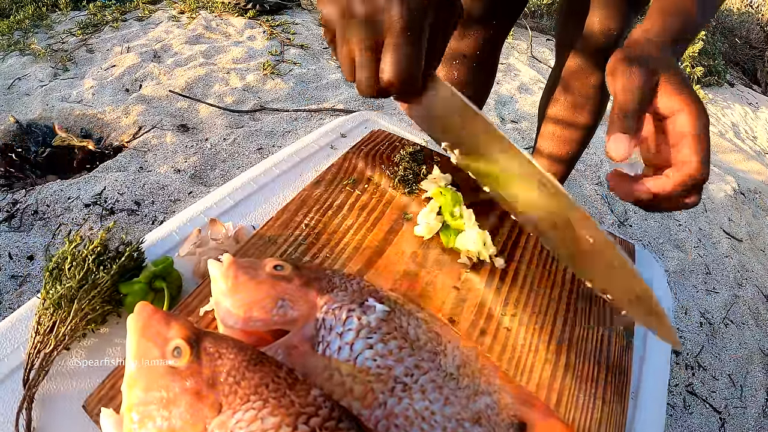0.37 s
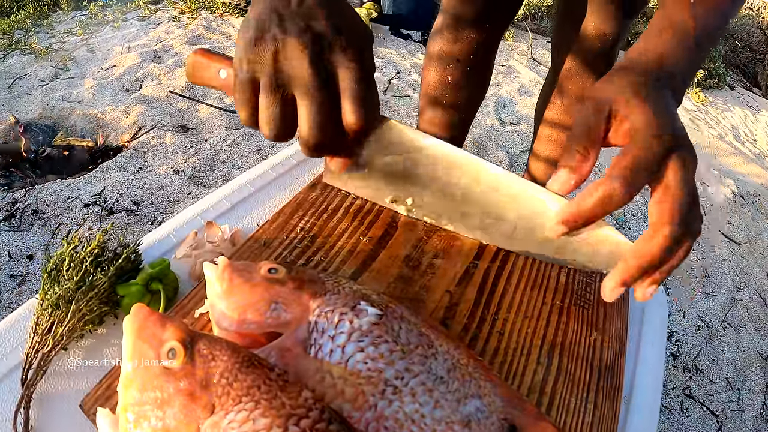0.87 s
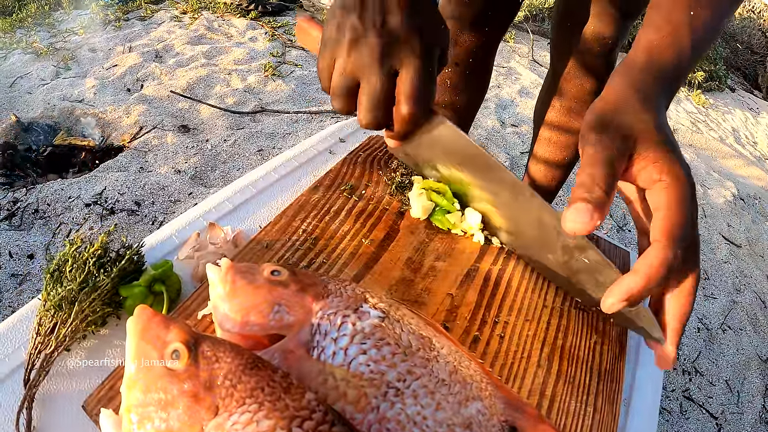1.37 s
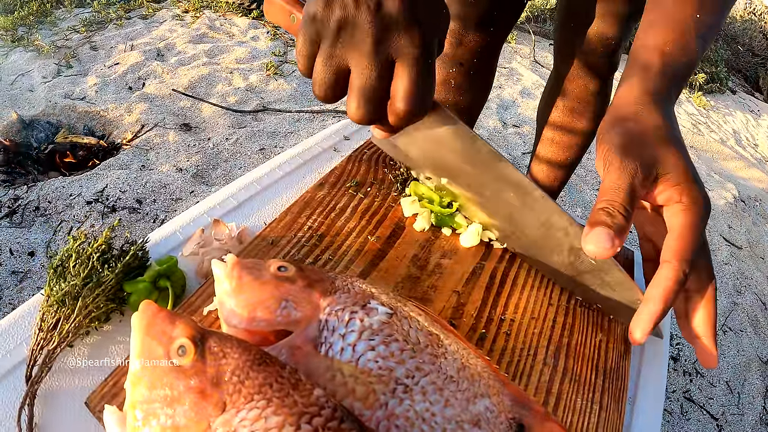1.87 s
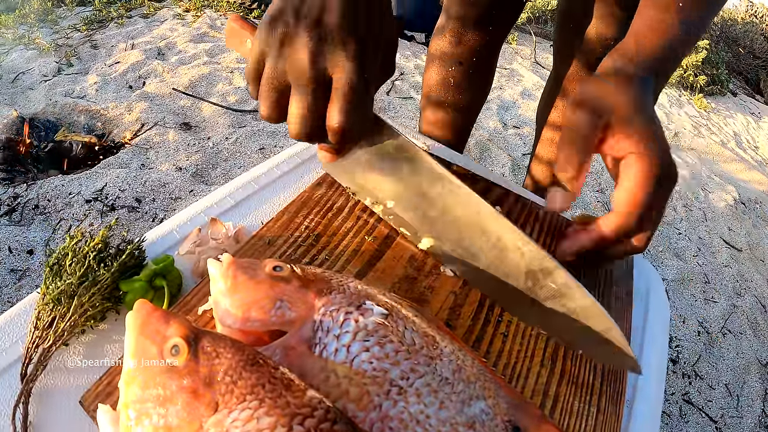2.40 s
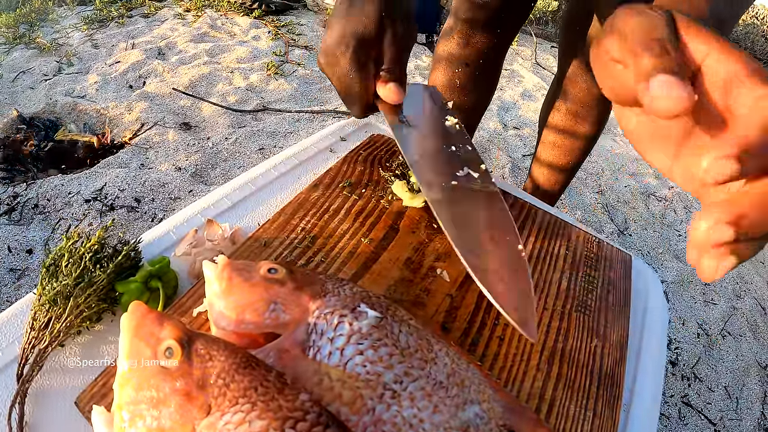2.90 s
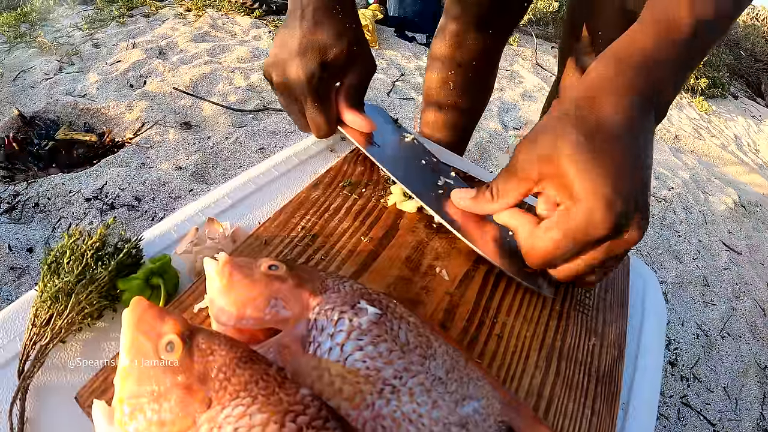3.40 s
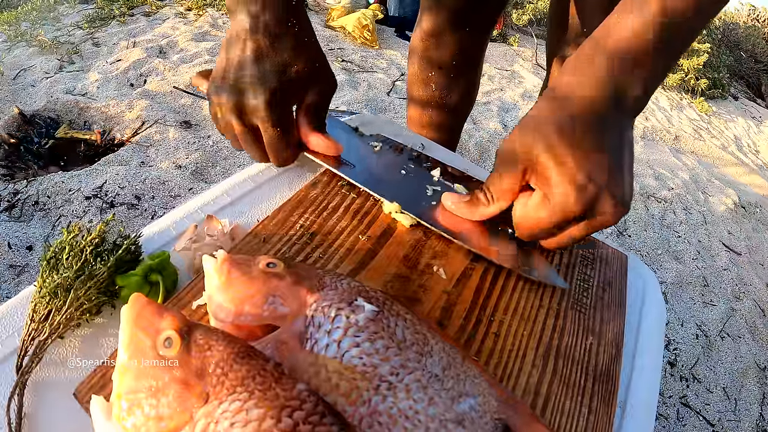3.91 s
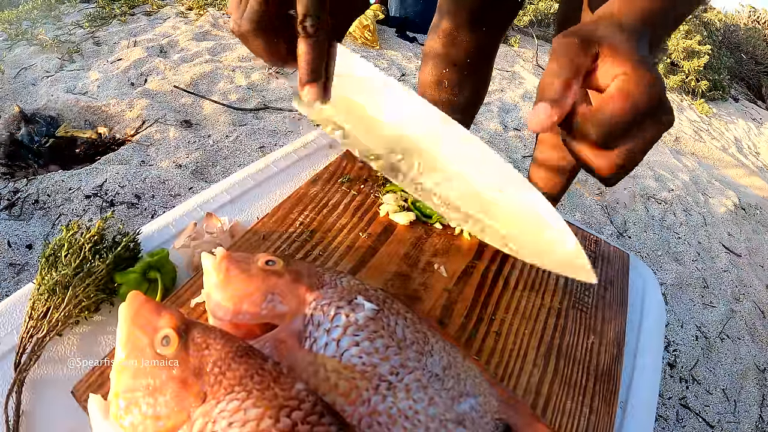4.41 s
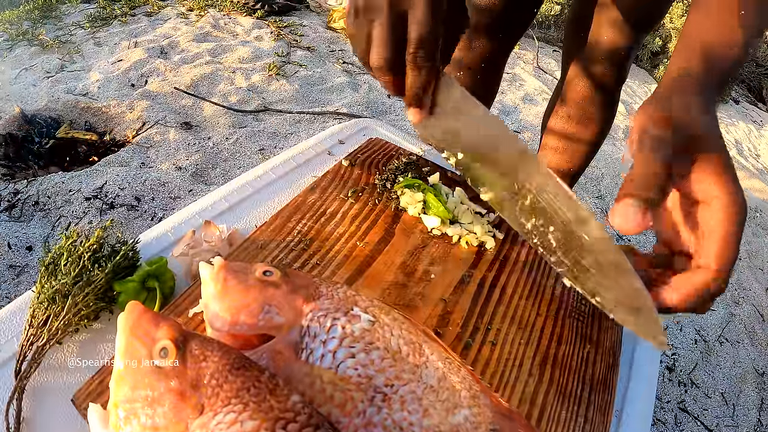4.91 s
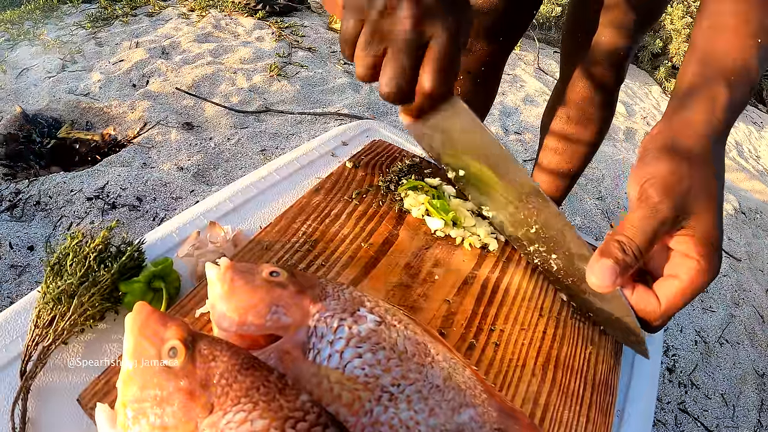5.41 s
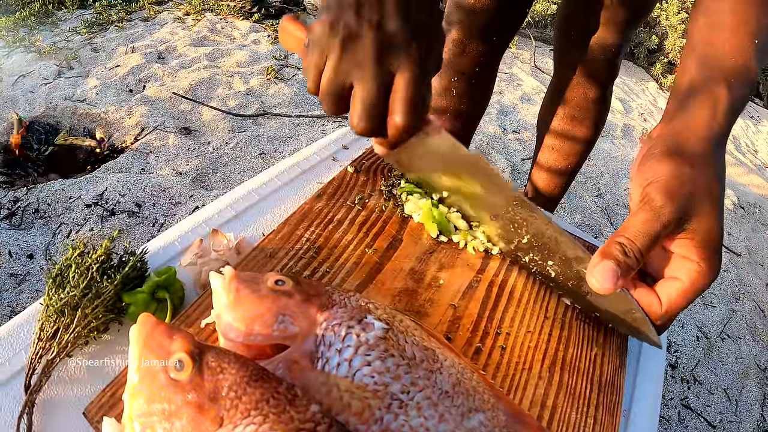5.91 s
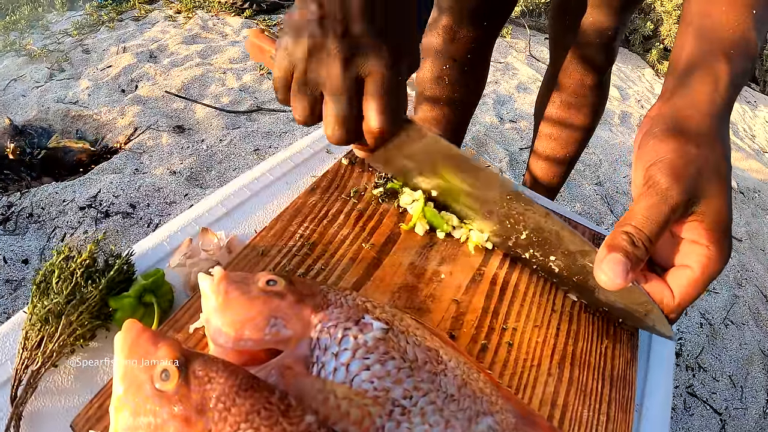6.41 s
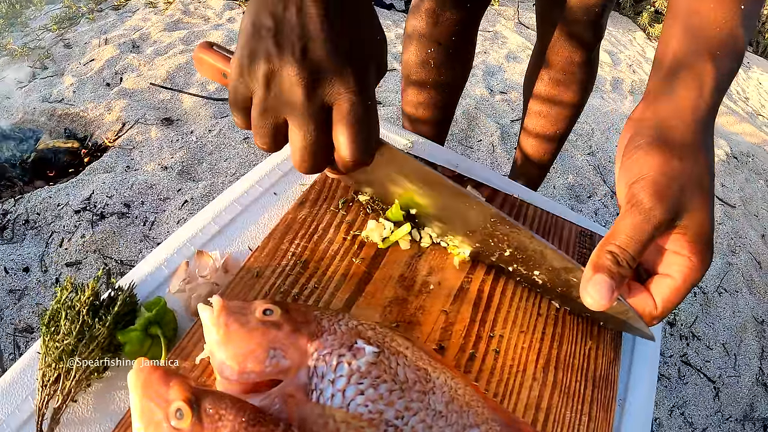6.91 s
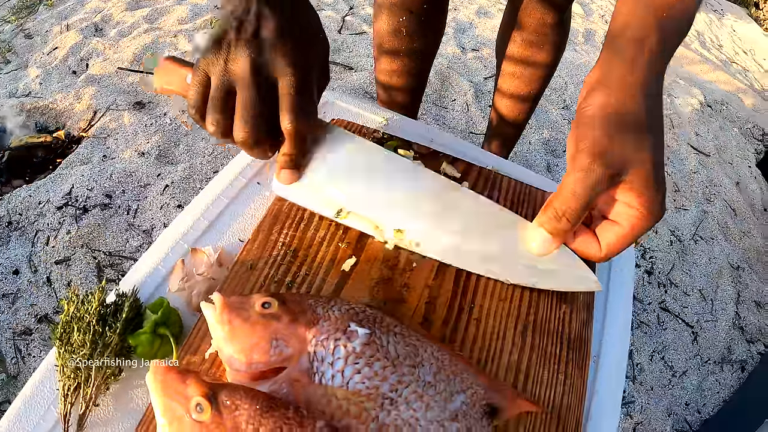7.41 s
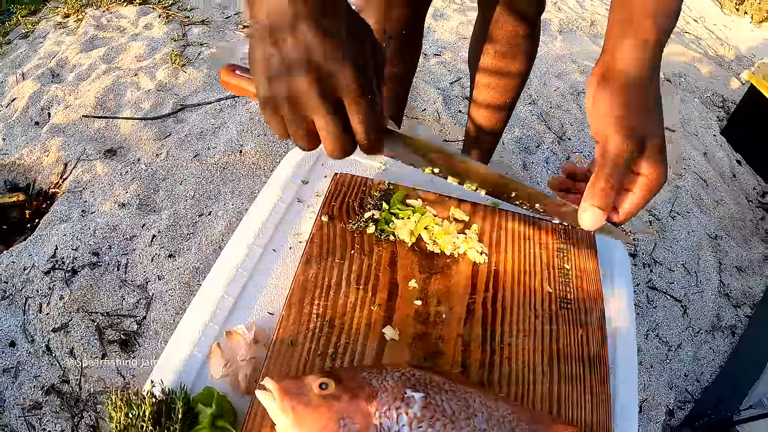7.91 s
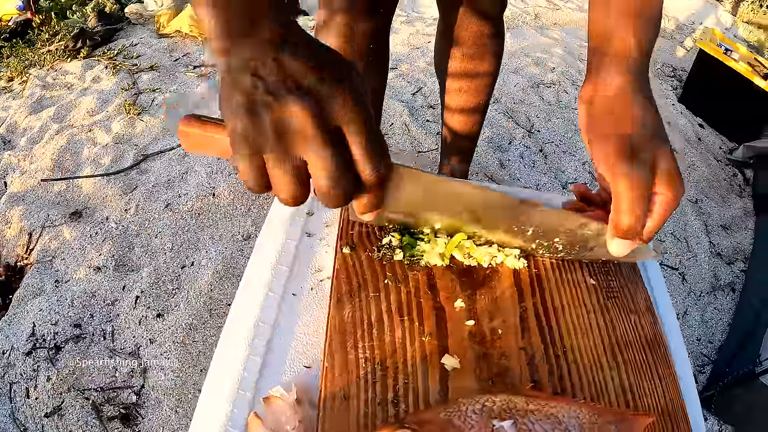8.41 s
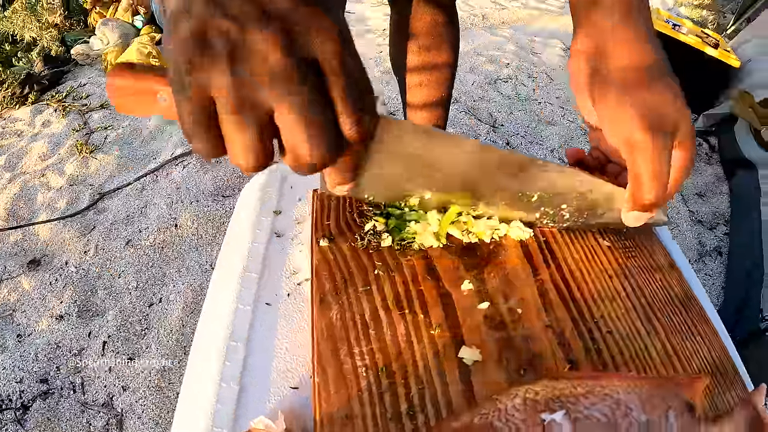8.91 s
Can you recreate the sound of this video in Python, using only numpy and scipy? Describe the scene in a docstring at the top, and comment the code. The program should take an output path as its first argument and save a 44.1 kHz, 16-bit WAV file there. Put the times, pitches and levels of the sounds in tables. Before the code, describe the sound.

On an open beach, a blade minces moist vegetables very near the microphone, slightly left. Dry woody knocks carry low boxy thumps and short crunches. A brief chopping burst gives way to quiet wiping and sticky clicks, then a faster, longer run at about six chops a second. Metallic, gritty scrapes gather the pieces between bursts. Distant surf hiss, faint insect whirr and low wind rumble continue underneath.

```python
"""A large knife minces garlic and pepper on a wooden board that lies on a hollow plastic box on a beach.
The edge crunches through the pile, knocks the board, makes the box thump and scrapes the pieces together;
surf hisses far off, insects whirr and wind buffets the microphone.
Blows ring decaying sine modes; crunch and friction are enveloped noise grains; the beach is shaped noise."""
import sys
import numpy as np
from scipy import signal
from scipy.fft import rfft, irfft, next_fast_len
from scipy.io import wavfile
from scipy.ndimage import uniform_filter1d, map_coordinates

SR = 44100
rng = np.random.default_rng(int(sys.argv[2]) if len(sys.argv) > 2 else 0)


def elevation(decibels):
    """Turn decibel levels (scalar or array-like) into linear amplitude ratios."""
    levels = np.asarray(decibels, float)
    return 10 ** (levels / 20)


def to_wav(s):
    """Save 16-bit WAV."""
    ch = np.atleast_2d(s).T  # columns
    pcm = np.round(np.clip(ch, -1, 1) * 32767)  # PCM
    wavfile.write(sys.argv[1], SR, pcm.astype(np.int16))


N = 399105

# rocking chops through the pile: (landing [s], sinking [s], knock [dB], crunch [dB],
# grind on the board [dB], box thump [dB])
CHOP_ROWS = [(1.499, 0.024, -46, -39.5, -35, -16.5), (1.689, 0.018, -19.5, -40, -26, -11),
             (1.8683, 0.022, -9, -35, -26, -5.5), (2.0322, .024, -8.5, -38, -24.5, -6),
             (2.1781, 0.018, -12.5, -28, -22, -7.5), (5.1444, 0.019, -12.5, -65, -53.5, -20),
             (5.412, 0.032, -16, -45, -33.5, -10), (5.571, 0.021, -20, -31, -27.5, -13.5),
             (5.7269, 0.016, -13, -33.5, -22.5, -10.5), (5.8847, .02, -16.5, -31, -25.5, -11.5),
             (6.04, 0.018, -11.5, -32.5, -24.5, -6.5), (6.1909, 0.014, -20.5, -28, -24, -9.5),
             (6.3478, 0.017, -16, -28, -23, -9), (6.5069, 0.019, -14.5, -27, -24.5, -5.5),
             (6.6679, 0.022, -9.5, -31, -23.5, -4.5), (6.8353, 0.027, -29, -33, -26, -12),
             (6.994, 0.021, -30, -37, -23.5, -19.5), (7.1499, 0.015, -12, -34.5, -21, -10.5),
             (8.735, 0.026, -31, -40, -35, -27), (8.889, 0.0098, -17.5, -34.5, -22.5, -12),
             (9.048, 0.015, -21, -44, -28, -26)]
# blade set down or knocked on the bare board: (time [s], level [dB], lift of the high modes [dB],
# lift of the low modes [dB], board pitch [ratio])
KNOCK_ROWS = [(0.171, -13, -11.5, -3, 0.925), (0.2098, -16, 3, 0, .97), (0.752, -3, -6, -4.5, 1.14),
              (1.4495, -5, -5, -1.5, 1.06), (2.1665, -24.5, 25, 3.5, .98), (2.5001, -4, -4, -4.5, 1.03),
              (3.5639, -22.5, -3, -6, .97), (3.626, -26, 8, -30, 1.09), (3.745, -19, 13.5, -32, .97),
              (4.601, -7.5, 6, 0, 1.03), (5.1256, -18, -8, 4, .9), (5.4273, -15, -23, -9, .99),
              (5.4627, -10.5, -4, -5, .99), (5.6234, -21, -21, 1.5, .99), (5.7441, -11.5, -15, -5.5, 0.964),
              (6.2247, -22.5, -7, -5, 0.91), (7.5021, -11, 12.5, -1, 1.014), (8.06, -3, 5, -2.5, 0.983),
              (8.4717, -2.5, 2.5, -4.5, .95), (8.784, -24, 1, 0.5, .99), (8.9262, -13.5, 1, 1, 0.903)]
# resonances of the pressed blade: (frequency [Hz], width [Hz], level [dB])
BLADE_MODES = [(1096, 34, 3), (1970, 60, -0.5), (2256, 35, -3), (2510, 150, -3), (2820, 110, -3),
               (3590, 330, -12.5), (4250, 50, -6), (4700, 110, -6.5), (5360, 79, -12.5), (5920, 80, -10),
               (7130, 90, -9.5), (8130, 240, -24.5), (9950, 110, -19.5)]


def unit(x):
    """Scaled to rms 1."""
    return x / np.sqrt(np.mean(x ** 2) + 1e-20)


def along(points, hz):
    """Interpolates (frequency [Hz], value) points on a log frequency axis."""
    point_hz, value = np.transpose(points)
    return np.interp(np.log(hz + 1), np.log(point_hz + 1), value)


def curves(rows):
    """One value per sample for each column after the time."""
    time_s, *columns = np.transpose(rows)
    return [np.interp(np.arange(N) / SR, time_s, column) for column in columns]


def wobble(rate_hz, size=N):
    """A smooth random curve with rate_hz knots a second."""
    knots = rng.standard_normal(size // 32 + 4)
    return map_coordinates(knots, [np.arange(size) * rate_hz / SR])


def filtered(x, response):
    """x through a complex response of frequency."""
    size = next_fast_len(x.shape[-1] + 8192)
    spectrum = rfft(x, size) * response(np.fft.rfftfreq(size, 1 / SR))
    return irfft(spectrum, size)[..., :x.shape[-1]]


def grit(spike_db, rate_hz, size=N):
    """Noise whose random gain makes short grains of unequal size; rms 1."""
    return unit(rng.standard_normal(size) * elevation(spike_db * wobble(rate_hz, size)))


def add(track, time_s, sound):
    """Mixes a sound into a track at a time."""
    room = track[round(time_s * SR):][:len(sound)]
    room += sound[:len(room)]


def crackle(envelope, spike_db, rate_hz):
    """Grains under an envelope, coloured afterwards; rms 1 where the envelope is 1."""
    # colour of the crunch: (frequency [Hz], level [dB])
    colour = [(760, -36.5), (1300, -3), (2470, -7), (3110, -14), (4750, -7), (7660, -18.5), (11700, -33),
              (15500, -48)]
    grains = grit(spike_db, rate_hz)
    pair = np.array([grains, grains * envelope])
    plain, shaped = filtered(pair, lambda hz: elevation(along(colour, hz)))
    return shaped / np.std(plain)


def board_ring(edge_db, body_db, scatter_db, damping, pitch=1):
    """The board's modes after one blow: a sharp contact lifts the high ones, a heavy one the low."""
    # board modes at pitch 1 and damping 1: (frequency [Hz], level [dB], t60 [s])
    board_modes = [(206.6, -10.5, 0.053), (319, -8.5, 0.041), (405, -10, 0.032), (515.5, -6, 0.032),
                   (587.4, -8, 0.034), (857, -7, 0.031), (994, 3.5, 0.027), (1109.5, -9.5, 0.048),
                   (1266, -1, 0.018), (1420, -3.5, 0.014), (1675, -22, 0.041), (1990, -21.5, 0.027),
                   (2250, -22.5, 0.019), (2423, -11, 0.017), (3230, -19, 0.011), (4050, -29, 0.027),
                   (4820, -21.5, 0.0097), (5700, -41, .013)]
    t = np.arange(SR // 10) / SR
    hz, db, t60_s = np.transpose(board_modes)[:, :, None]
    db = db + np.where(hz > 1800, edge_db, np.where(hz < 700, body_db, 0))
    chance = rng.standard_normal((2, *hz.shape))  # each spot rings a little differently
    turns = pitch * hz * (1 + 0.027 * chance[0]) * t
    decay = elevation(db + scatter_db * chance[1] - 60 * damping * t / t60_s)
    ring = decay * np.sin(2 * np.pi * turns)
    return ring.sum(axis=0) * (1 - np.exp(-t / 0.00058))


def board_rub(envelope, edge_db, body_db, damping):
    """The pressed board driven by dense friction grains; rms 1 where the envelope is 1."""
    ring = board_ring(edge_db, body_db, scatter_db=1.0, damping=damping)
    grains = grit(spike_db=4.5, rate_hz=400, size=len(envelope))
    return signal.fftconvolve(grains * envelope, ring / np.linalg.norm(ring))[:len(envelope)]


def cuts():
    """The crunch swells as the edge sinks in and stops short at the wood; then the blade rocks back."""
    # pieces crushed or wiped off without a landing: (start [s], length [s], crunch [dB],
    # grind on the board [dB])
    crush_rows = [(0.165, 0.014, -57, -38.5), (1.537, 0.011, -47.5, -38.5), (3.556, 0.026, -37, -45.5),
                  (3.957, 0.018, -42, -47), (4.058, 0.036, -50, -55.5), (4.098, 0.022, -50, -62),
                  (5.276, 0.014, -50.5, -52), (7.263, 0.01, -43, -39), (7.889, 0.016, -38.5, -44)]
    full_before_s, stop_after_s = 0.005, 0.0054  # around the landing
    crush_full = 0.65  # share of the length at which a crush is loudest
    grind, crunch = np.zeros(N), np.zeros(N)
    t = np.arange(SR // 5) / SR - .02
    strokes = [(s - sink_s, sink_s - full_before_s, sink_s + stop_after_s, crunch_db, board_db)
               for s, sink_s, _, crunch_db, board_db, _ in CHOP_ROWS]
    strokes += [(s, crush_full * length_s, length_s, crunch_db, board_db)
                for s, length_s, crunch_db, board_db in crush_rows]
    for start_s, full_s, stop_s, crunch_db, board_db in strokes:
        shape_s = [-.02, 0, .004, full_s, stop_s, stop_s + 0.016]
        shape_db = np.interp(t, shape_s, [-48.5, -19, -3, 6.0, -1.0, -51.5], right=-99)
        rock_db = np.interp(t - stop_s, [0, .01, .045, .1], [-31, -12.5, -14.5, -51.5])
        rock_db = rock_db + 4 * wobble(64.6, len(t))
        add(crunch, start_s + t[0], elevation(crunch_db + shape_db))
        pressure = elevation(0.77 * shape_db) + elevation(rock_db)
        rub = board_rub(pressure, edge_db=6.5, body_db=2.0, damping=2.07)
        add(grind, start_s + t[0], elevation(board_db) * rub)
    return grind + crackle(crunch, spike_db=4, rate_hz=700)


def knocks():
    """Each blow rings the board and gives a short bright crack."""
    chop_edge_db, chop_body_db, chop_pitch = -2.5, -5, 0.92
    tap_after_s, tap_db = .04, -14  # the rocking blade taps the board again after a landing
    crack_db = -24  # against the lifted high modes
    out, cracks = np.zeros(N), np.zeros(N)
    t = np.arange(SR // 50) / SR
    landings = [(s, db, chop_edge_db, chop_body_db, chop_pitch) for s, _, db, *_ in CHOP_ROWS]
    taps = [(s + tap_after_s * (1 + 0.17 * rng.standard_normal()), db + tap_db, *rest)
            for s, db, *rest in landings[:-1]]
    for s, db, edge_db, body_db, pitch in [*KNOCK_ROWS, *landings, *taps]:
        ring = board_ring(edge_db, body_db, scatter_db=5.0, damping=1.117, pitch=pitch)
        add(out, s, elevation(db) * ring)
        add(cracks, s, elevation(db + edge_db + crack_db - 60 * t / 0.018))
    return out + crackle(cracks, spike_db=0.5, rate_hz=900)


def thumps():
    """The hollow box booms once the blade has landed; the lid first gives way for half a cycle."""
    after_s, knock_thump_db = 0.0022, -3  # a knock's thump against its lifted low modes
    open_hz, pressed_hz = 83.6, 76.7  # lid under a knock and under both chopping hands
    pitch_scatter = .07
    rebound_s, rebound_db, rebound_hz = 0.0311, -10.5, 79  # the blade rocks back after a chop
    upper_hz, upper_db = 101.2, -14  # the lid's second mode
    out, t = np.zeros(N), np.arange(SR // 5) / SR
    booms = [(s, db + body_db + knock_thump_db, open_hz) for s, db, _, body_db, _ in KNOCK_ROWS]
    booms += [(s, db, pressed_hz) for s, *_, db in CHOP_ROWS]
    booms += [(s + rebound_s, db + rebound_db, rebound_hz) for s, *_, db in CHOP_ROWS]
    for s, db, hz in booms:
        hz = hz * (1 + pitch_scatter * rng.standard_normal())
        lead_s = .5 / hz
        upper = np.sin(2 * np.pi * upper_hz * (t - lead_s)) * (t > lead_s)
        upper = elevation(upper_db + 3.6 * rng.standard_normal()) * upper
        wave = np.sin(2 * np.pi * hz * t) - upper
        swell = np.clip(0.1 * t / lead_s, 0, .3) + 0.57 * np.clip((t - lead_s) / 0.0023, 0, 1)
        decay = elevation(db - 60 * np.abs(t - lead_s) / 0.12)
        add(out, s + after_s - lead_s, -decay * swell * wave)
    return out


def scrapes():
    """Blade dragged sideways: friction grains ring the blade and the board, with a broad rasp."""
    # (start [s], push [s], release [s], blade [dB], low board modes against the blade [dB])
    scrape_rows = [(0.21, .112, 0.044, -26.5, -4.5), (0.81, 0.15, 0.044, -35, 5.5),
                   (2.557, 0.1, 0.0085, -41.5, -0.5), (4.675, 0.098, 0.014, -36.5, -1),
                   (7.515, 0.14, 0.079, -34, 0), (8.083, 0.11, 0.014, -36, -5.5)]
    grip_s = 0.046  # rise
    board_db, board_follows = 1.5, 0.5  # board against the blade; board dB a body dB
    rasp_db = -5  # against the blade
    out, hiss, t = np.zeros(N), np.zeros(N), np.arange(SR // 3) / SR
    blade = np.array(BLADE_MODES)
    for start_s, length_s, release_s, blade_db, body_db in scrape_rows:
        push_s = [0, grip_s, length_s, length_s + release_s]
        push = elevation(blade_db + np.interp(t, push_s, [-16.5, -0.5, -1.5, -19.5], right=-99))
        # each stroke grips the blade a little differently: frequency and level scatter
        modes = blade * (1 + [.025, 0, 0] * rng.standard_normal(blade.shape))
        modes = modes + [0, 0, 2.5] * rng.standard_normal(blade.shape)

        def steel(f):
            """Blade resonances in parallel with alternating sign."""
            return sum((-1) ** k * elevation(db) * 1j * f * width / (hz * hz - f * f + 1j * f * width)
                       for k, (hz, width, db) in enumerate(modes))

        grains = push * grit(spike_db=2.5, rate_hz=151.0, size=len(t))
        add(out, start_s, elevation(18.5) * filtered(grains, steel))
        high_rub = board_rub(push, edge_db=-21, body_db=-15, damping=0.59)
        add(out, start_s, elevation(board_db + board_follows * body_db) * high_rub)
        low_rub = board_rub(push, edge_db=-61, body_db=10.0, damping=0.97)
        add(out, start_s, elevation(body_db) * low_rub)
        add(hiss, start_s, elevation(rasp_db) * push)
    return out + crackle(hiss, spike_db=-1.5, rate_hz=500)


def blade_ring():
    """A freely held blade rings on in its own resonances."""
    # knocks after which the loosely held blade rings on: (time [s], level [dB])
    ring_rows = [(4.6, -28)]
    free_width = 0.39  # resonance width over that of the pressed blade
    tilt_db_per_khz = -2.5  # high resonances are struck more weakly
    out, t = np.zeros(N), np.arange(SR // 4) / SR
    hz, width_hz, db = np.transpose(BLADE_MODES)[:, :, None]
    for s, ring_db in ring_rows:
        mode_db = ring_db + db + tilt_db_per_khz * hz / 1000 + 2 * rng.standard_normal(db.shape)
        decay = elevation(mode_db) * np.exp(-np.pi * free_width * width_hz * t)
        add(out, s, np.sum(decay * np.sin(2 * np.pi * hz * t), axis=0))
    return out


def snaps():
    """Snaps of pieces and wet skin, plus a sprinkle of faint ones: a few noisy cycles each."""
    # (time [s], level [dB], pitch [Hz])
    snap_rows = [(0.725, -42, 3540), (1.0101, -40.5, 6100), (1.349, -39.5, 5100), (1.3733, -36, 6200),
                 (1.7379, -36, 4360), (1.86, -16, 5170), (3.04, -38, 4600), (3.4526, -37, 4820),
                 (3.5415, -36.5, 4700), (3.6445, -21.5, 5700), (3.702, -39.5, 4000), (3.767, -31.5, 3650),
                 (4.0244, -49, 4890), (4.1404, -43, 4800), (4.354, -39, 4340), (4.5142, -34.5, 4870),
                 (4.8254, -45, 5500), (4.9202, -43, 4360), (5.1767, -37.5, 4170), (5.4929, -30, 7660),
                 (6.548, -34, 6000), (6.8855, -27.5, 7200), (7.208, -35.5, 3590), (7.3417, -38.5, 7100),
                 (7.4669, -43, 7000), (7.7246, -33, 4230), (7.892, -19.5, 7100), (8.262, -37, 3500),
                 (8.4442, -45, 3600)]
    out, t = np.zeros(N), np.arange(SR // 100) / SR
    faint = rng.random((70, 3)) * [N / SR, 14, 4000] + [0, -64, 3500]
    for s, db, hz in [*snap_rows, *faint]:
        band = signal.butter(2, [hz / 2.03, min(hz * 1.36, 15000)], "bandpass", fs=SR)
        burst = signal.lfilter(*band, rng.standard_normal(len(t)))
        add(out, s, elevation(db - 60 * t / 0.01) * unit(burst))
    return out


def spread(x):
    """Two ports: left hears a little late and brighter; the moving hands shade each port in turn."""
    # near sound: (frequency [Hz], left-right likeness [0..1], phase by which left leads [rad])
    near_rows = [(100, 1, -0.05), (530, 0.96, -0.17), (1000, 0.92, -0.12), (3100, 0.97, -0.77),
                 (6000, 0.72, -0.19), (14000, 0.33, -0.12)]
    hz, alike, lead_rad = np.transpose(near_rows)

    def delay(f):
        return 1j * np.tan(np.interp(f, hz, lead_rad) / 2) + 0.11 * f / 10000

    def shade(f):
        return np.tan(np.arccos(np.clip(np.interp(f, hz, alike), 0, 1)) / 2)

    late = filtered(x, delay)
    shaded = filtered(x * unit(wobble(120)), shade)
    return np.array([x + late + shaded, x - late - shaded])


def rush(spectrum, patchy_db):
    """Far stereo noise of rms 1 with time-frequency patches of random gain."""
    # far sound: (frequency [Hz], left-right likeness [0..1])
    far_rows = [(30, 0.56), (180, 0.9), (550, 0.85), (1650, 0.6), (5000, 0.68), (15000, 0.97)]
    z = signal.stft(rng.standard_normal((2, N)), nperseg=512)[2]
    field = uniform_filter1d(rng.standard_normal(z.shape[1:]), size=6, axis=0)
    field = uniform_filter1d(field, size=10, axis=1)
    pair = signal.istft(z * elevation(patchy_db * unit(field)), nperseg=512)[1][:, :N]

    def mid_side(hz):
        turn = np.arccos(np.clip(along(far_rows, hz), 0, 1)) / 2
        return elevation(along(spectrum, hz)) * [np.cos(turn), np.sin(turn)]

    mid, side = filtered(pair, mid_side)
    return unit(np.array([mid + side, mid - side]))


def beach():
    """Surf body and fizz, a narrow insect band and lumpy wind on the ports."""
    # (time [s], wind buffet [dB], surf [dB], surf fizz [dB])
    air_rows = [(0.0, -29, -56.5, -72), (0.15, -32, -46.5, -59.5), (0.95, -42.5, -55.5, -66.5),
                (1.46, -45, -52, -66.5), (2.07, -32, -49.5, -64.5), (2.85, -57.5, -57.5, -69.5),
                (3.45, -43.5, -49.5, -56.5), (3.8, -51, -48, -54), (4.01, -36, -50.5, -54),
                (4.26, -45.5, -52.5, -62.5), (4.9, -46, -54.5, -68), (5.62, -38, -47, -62),
                (6.23, -37.5, -50.5, -60.5), (7.16, -38.5, -47, -57.5), (7.6, -25, -45, -61),
                (7.96, -37.5, -47.5, -52), (8.3, -33.5, -52.5, -62.5), (8.62, -45.5, -54, -68),
                (9.05, -34.5, -48.5, -76)]
    # insect band: (time [s], level [dB])
    insect_rows = [(0, -61), (2.4, -66.5), (2.8, -76), (3.2, -66), (5.3, -66), (6, -66), (9.05, -70.5)]
    # noise spectra: (frequency [Hz], level [dB])
    surf_spectrum = [(71, -50), (120, -2.5), (172, 0.5), (700, -6.5), (1000, -3.5), (1850, -11.5),
                     (2000, -13.5), (2100, -13.5), (2280, -14), (6000, -26), (7800, -38.5), (13200, -120)]
    fizz_spectrum = [(1760, -14.5), (3000, -7), (5880, -10), (6820, -11.5), (8800, -20), (11500, -35.5),
                     (15000, -57)]
    buffet_spectrum = [(8.8, -28), (15, -2), (43, -3), (134, -16), (200, -28), (250, -21), (320, -54.5),
                       (550, -120)]
    insect_spectrum = [(3700, -33), (4250, -1), (4500, -2.5), (5100, -27.0)]
    buffet_db, surf_db, fizz_db = curves(air_rows)
    surf = elevation(surf_db + 1.4 * wobble(5.9)) * rush(surf_spectrum, patchy_db=3.0)
    fizz = elevation(fizz_db) * rush(fizz_spectrum, patchy_db=.6)
    insect_db = curves(insect_rows)[0] + 1.5 * wobble(3.36)
    insects = elevation(insect_db) * rush(insect_spectrum, patchy_db=5.5)
    lumps = elevation(2.03 * wobble(12)) * rush(buffet_spectrum, patchy_db=3.5)
    wind = elevation(buffet_db) * unit(lumps)
    return surf + fizz + insects + wind


def scene():
    """The knife work, a little to the left, over the beach."""
    knife = spread(knocks() + blade_ring() + thumps() + cuts() + snaps() + scrapes())
    return knife * elevation([[.3], [-.3]]) + beach()


def band_limit(x):
    """A steep low-pass at the top of the band."""
    return signal.sosfilt(signal.butter(12, 16480, fs=SR, output="sos"), x)


def record(dry):
    """Gain control ducks all but the bass after loud blows; the microphone colours; peaks round off."""
    # microphone: (frequency [Hz], level [dB])
    port_response = [(11000, 0), (13500, 3), (15000, -31), (16500, -37)]
    # a narrow band that swells just before sharp sounds
    halo_hz, halo_width_hz, halo_db = 913, 16.7, -9
    fall = np.exp(-1 / (0.073 * SR))
    above_bass = filtered(dry.mean(axis=0), lambda hz: hz > 600)
    loud = signal.lfilter([1 - fall], [1, -fall], np.abs(above_bass))
    bass = filtered(dry, lambda hz: 1 / (1 + (hz / 400) ** 4))
    ducked = bass + (dry - bass) / (1 + np.roll(loud, SR // 100) / 0.027)  # acts 10 ms late

    def colouring(hz):
        halo = elevation(halo_db) / (1 - 1j * (hz - halo_hz) / halo_width_hz)  # rings backwards in time
        return elevation(along(port_response, hz)) * (1 + halo)

    heard = filtered(ducked, colouring)
    rounded = heard / (1 + np.abs(heard / 1.05) ** 6) ** (1 / 6)
    return band_limit(rounded)


dry = scene()
out = record(dry)
to_wav(out)
```